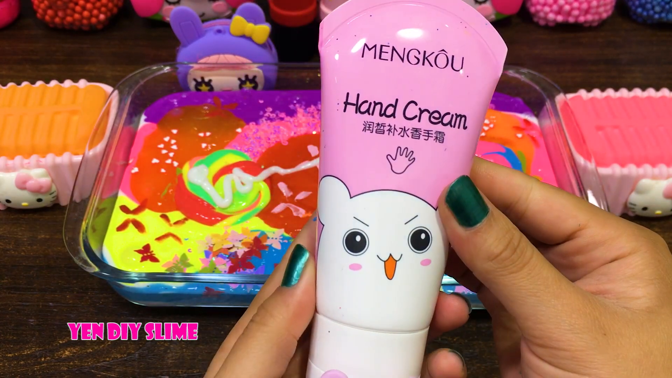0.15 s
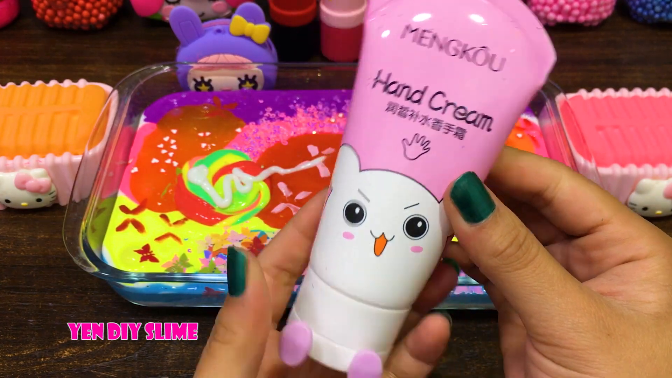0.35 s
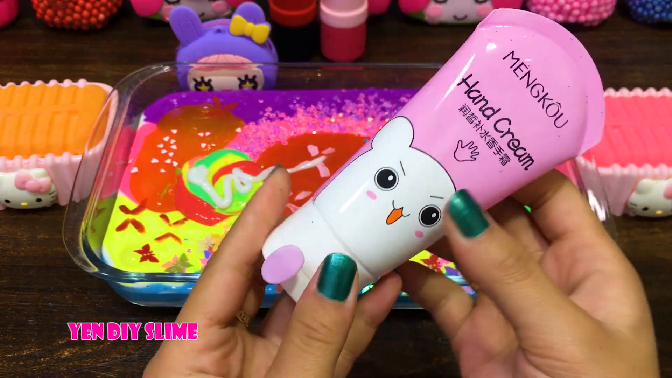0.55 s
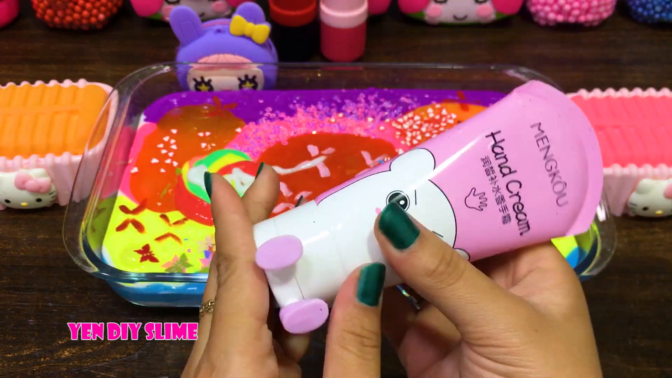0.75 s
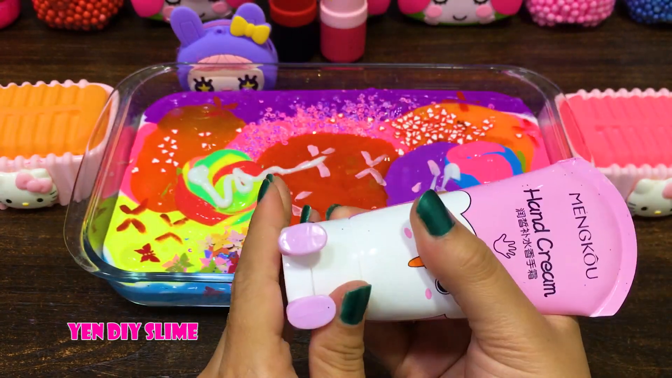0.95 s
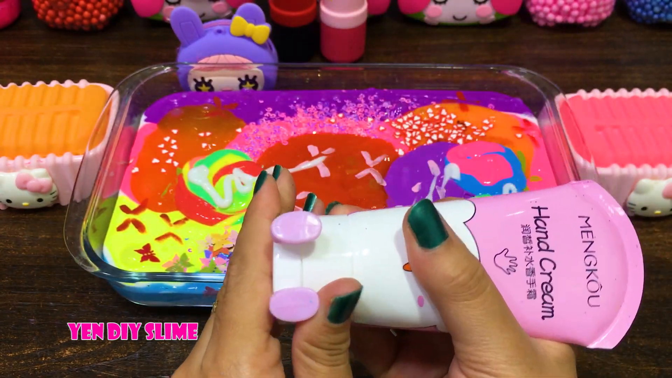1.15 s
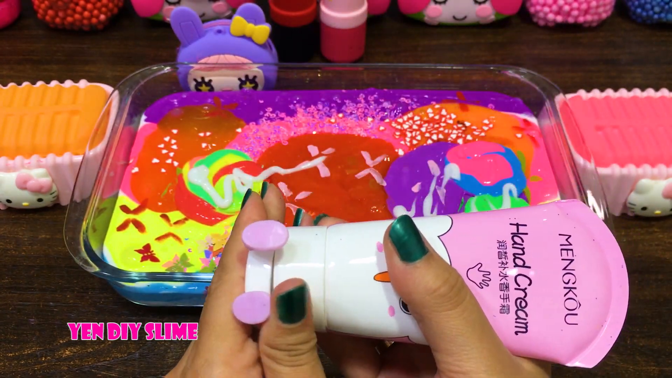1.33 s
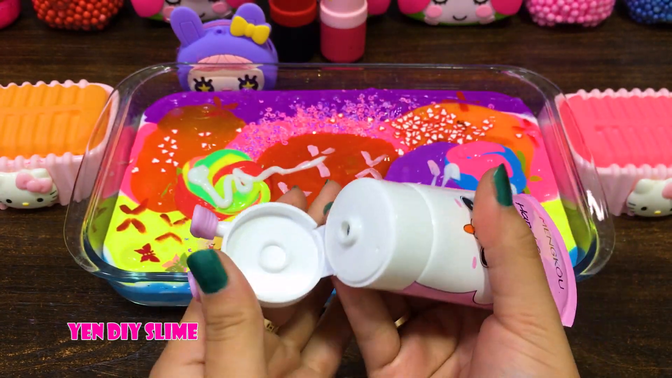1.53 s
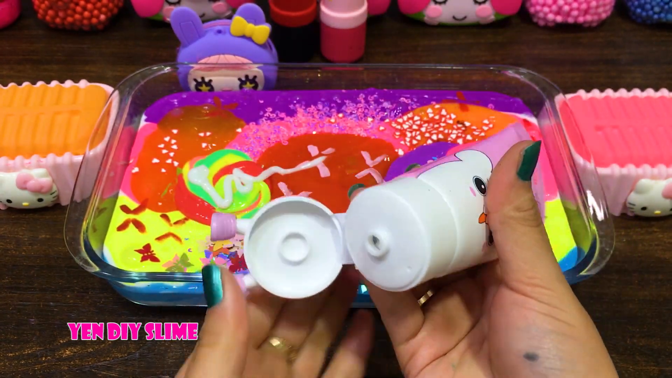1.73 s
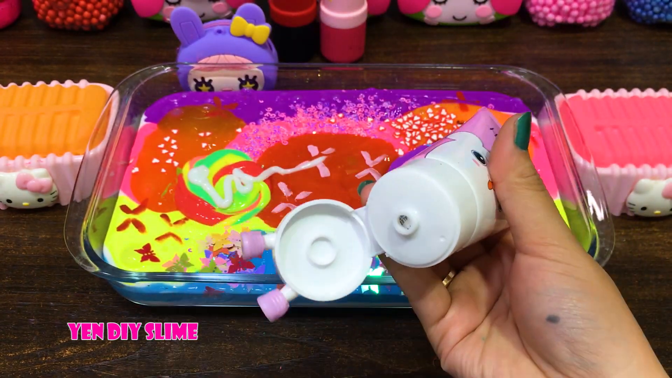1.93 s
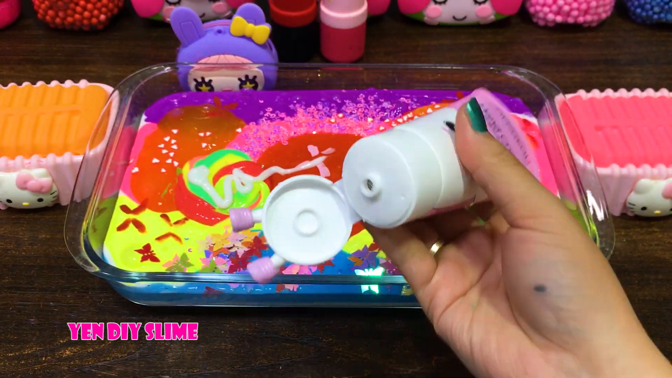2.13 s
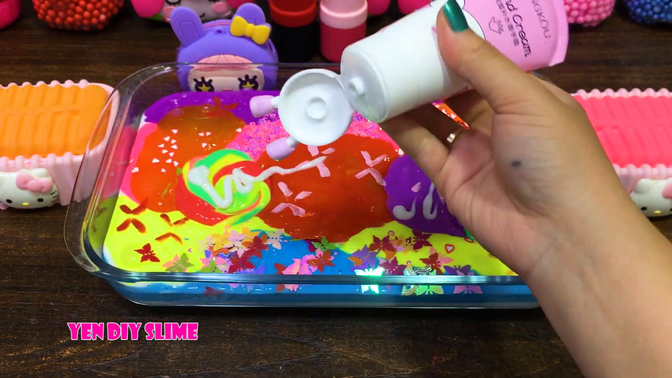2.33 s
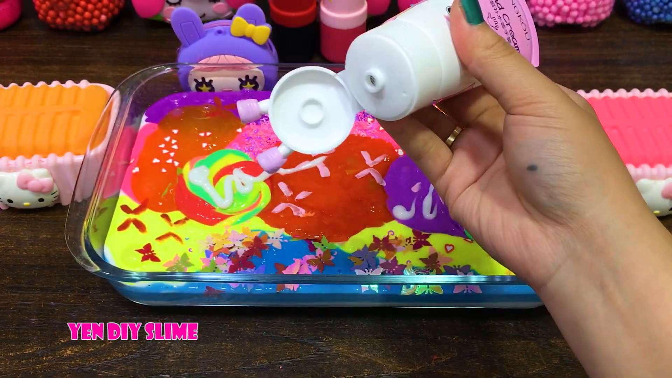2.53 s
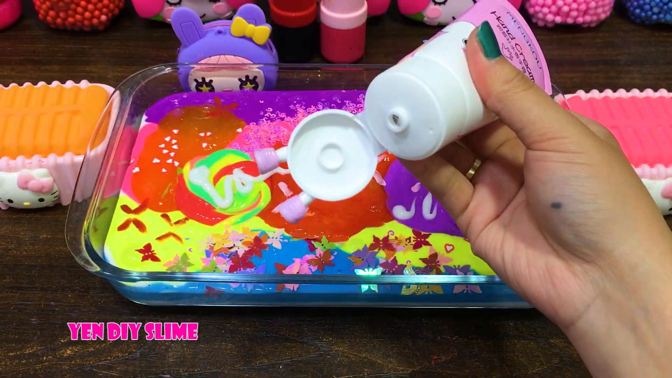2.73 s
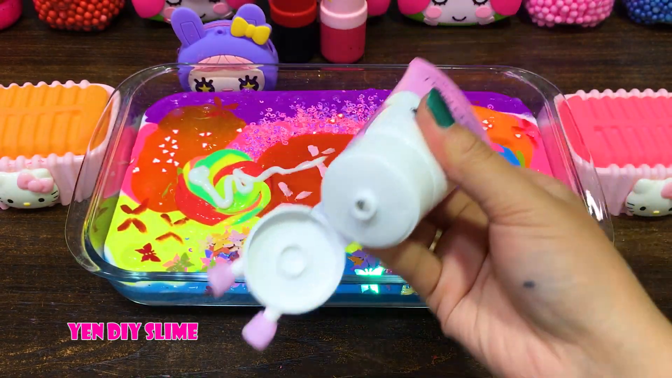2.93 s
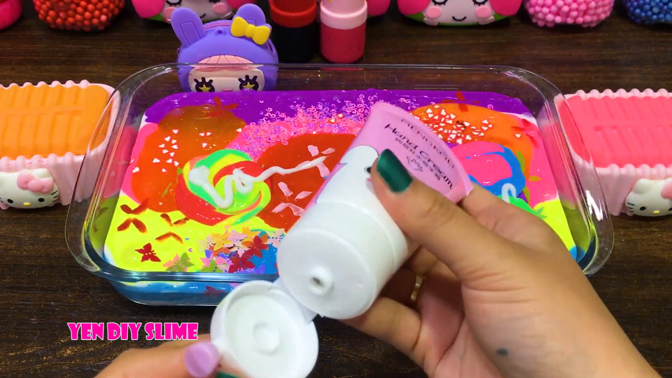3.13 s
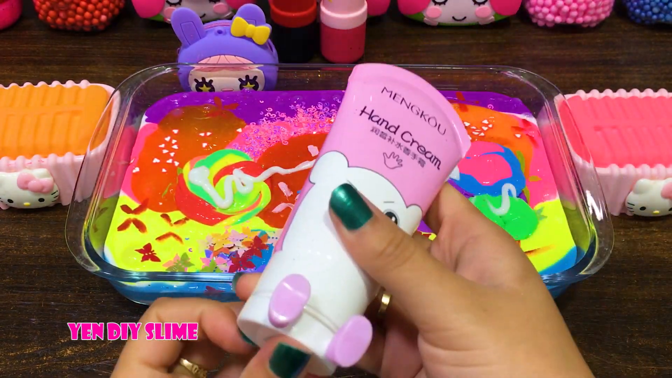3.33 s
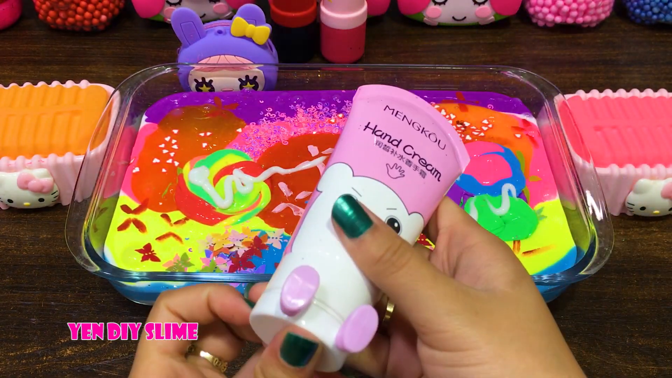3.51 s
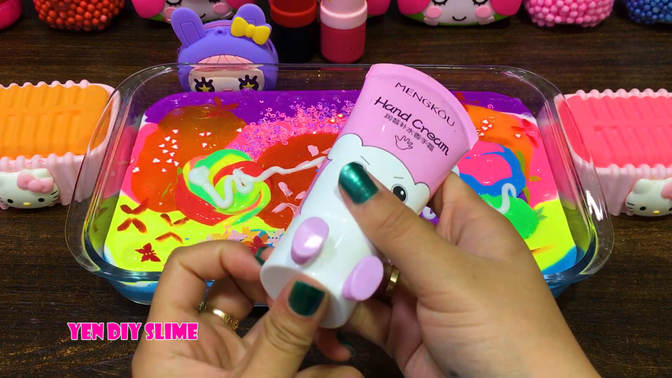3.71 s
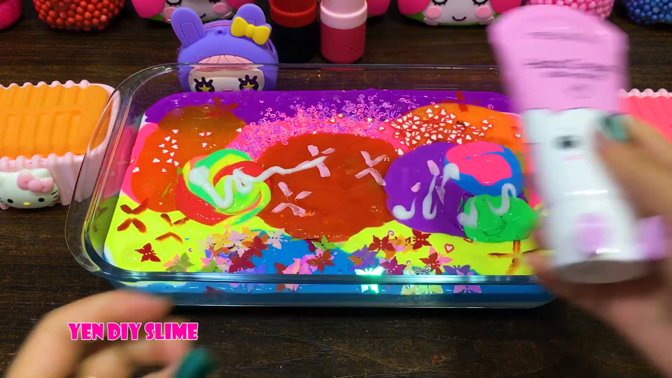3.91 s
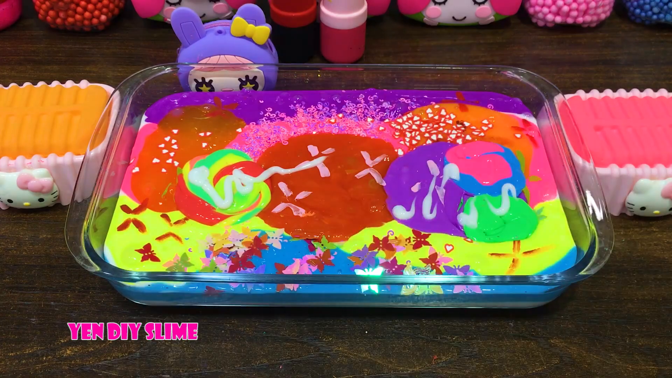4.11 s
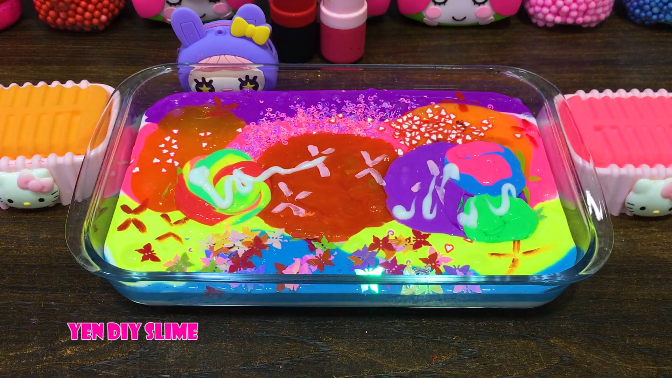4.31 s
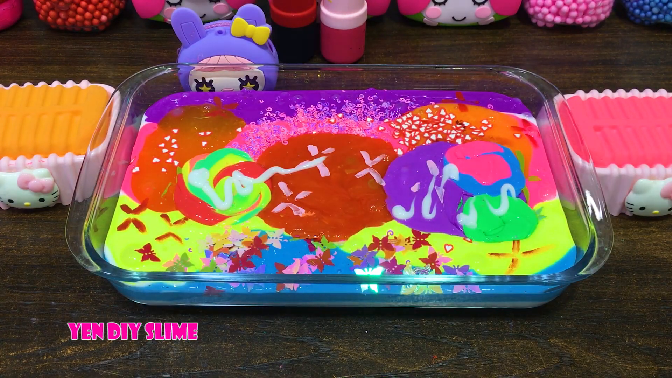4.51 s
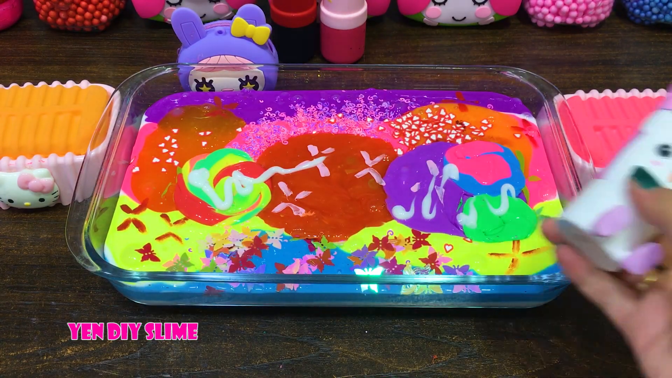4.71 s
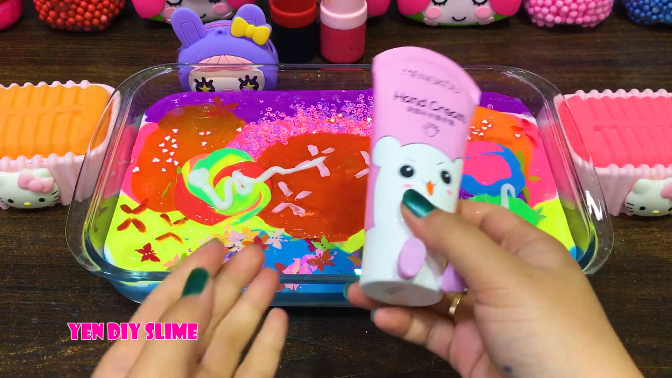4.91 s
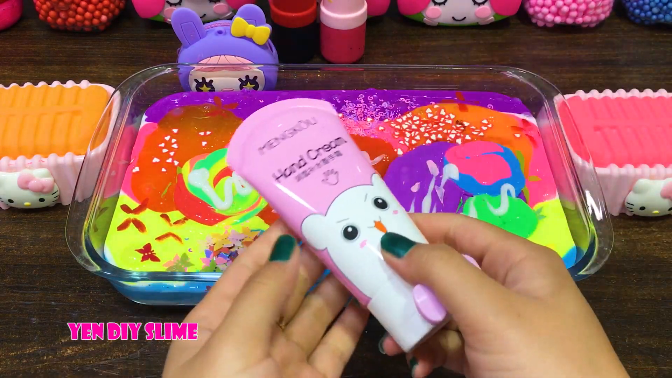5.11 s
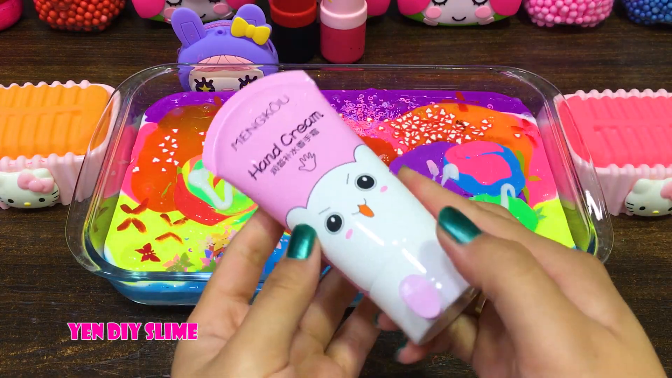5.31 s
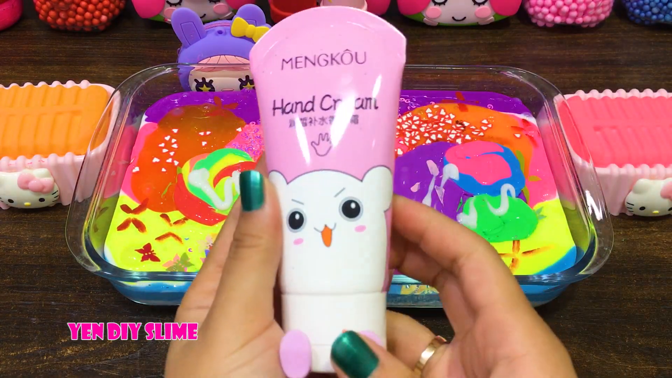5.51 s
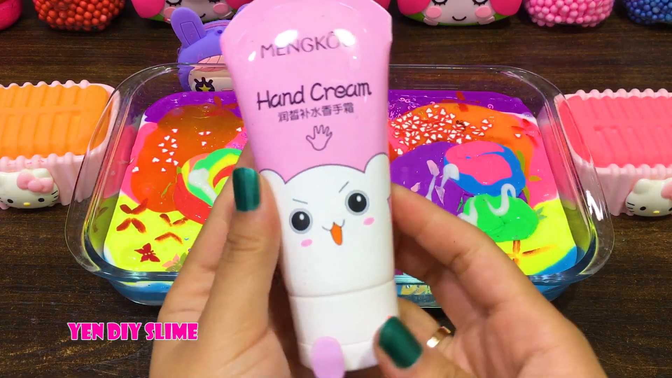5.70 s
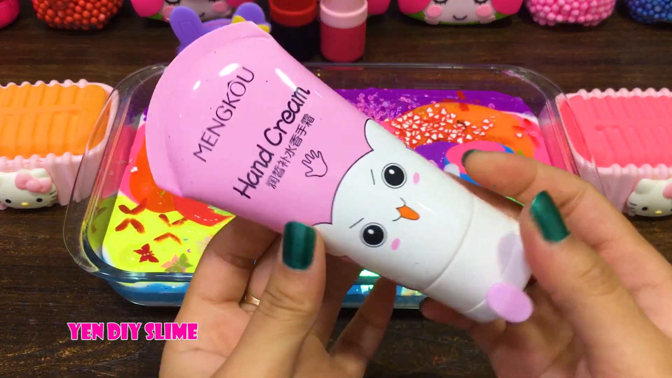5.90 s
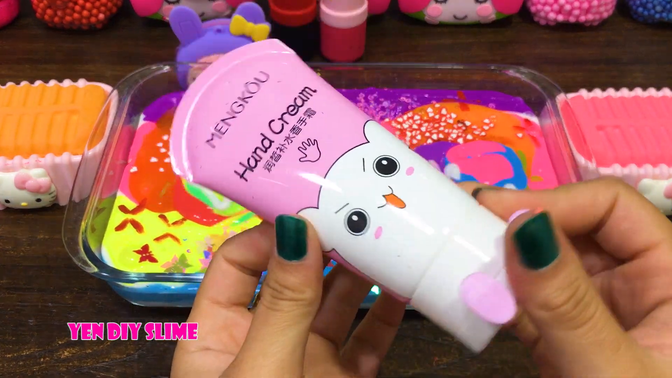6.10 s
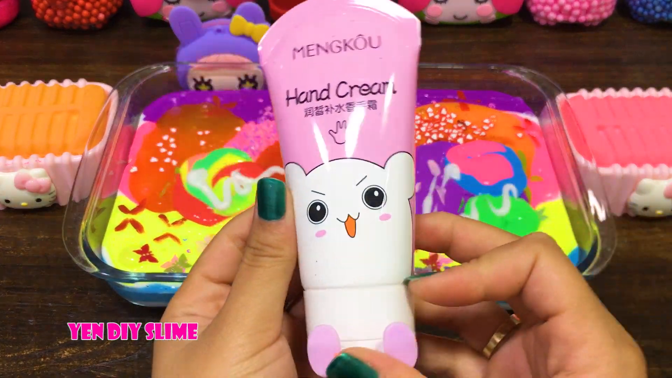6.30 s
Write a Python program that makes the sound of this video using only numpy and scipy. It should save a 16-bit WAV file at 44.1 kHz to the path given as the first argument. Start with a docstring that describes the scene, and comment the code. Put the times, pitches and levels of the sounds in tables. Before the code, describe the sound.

In a small, quiet room, a plastic tube is turned in the hands with light ticks and soft skin friction, heard up close. The cap opens with a pop, followed by a tiny creak of the hinge. A few ticks and a crisp click lead to the loudest sound, the hollow snap of the cap shutting. Faint rubbing follows as a low background hum rises slightly and stays.

```python
"""A plastic squeeze tube is turned in the hands, close by, in a small quiet room with a faint hum.
Fingers rub; the cap ticks lightly. It pops open (1.5 s); its hinge creaks in stick-slip as the
lid is bent back. The lid is folded down, ticks on the rim, clicks over the latch (3.4 s) and is
pressed home with a hollow snap (3.85 s). Each contact rings a part of the cap and knocks the tube.
Light handling goes on; the hum comes up (5.5 s), surges once and stays."""
import sys
import numpy as np
from scipy import signal
from scipy.fft import rfft, irfft
from scipy.io import wavfile

SR = 44100
rng = np.random.default_rng(int(sys.argv[2]) if len(sys.argv) > 2 else 0)


def waveform_to_disk(signal):
    """Save audio, clipped to [-1, 1], as 16-bit WAV at the path in sys.argv[1]."""
    frames = np.transpose(np.atleast_2d(signal))
    scaled = np.clip(frames, -1, 1) * 32767
    samples = np.round(scaled).astype(np.int16)
    wavfile.write(sys.argv[1], SR, samples)


N = 280035

# still air: f/Hz, level/dB
AIR_SPECTRUM = [(15, -40.5), (28, -17.5), (42, -8.5), (58, -0.5), (85, -3), (130, -8.5), (200, -10),
                (330, -12), (530, -18.5), (840, -21.5), (1700, -24), (3700, -28), (5200, -27.5),
                (6500, -30.5), (8200, -28), (12200, -31.5), (13600, -33.5), (15500, -33)]
# rumble within the air: t/s, level/dB
RUMBLE_CURVE = [(0, 2), (.4, 3.5), (.7, -4), (1.25, 0), (1.9, -6.5), (2.7, -4.5), (4.3, -3), (5.0, 2),
                (6.35, 3)]
# hum: f/Hz, level/dB once risen, extra level/dB in the surge
HUM_TONES = [(79.8, -64.5, 11.5), (137, -67, 2), (200, -78, -4)]
# room tail decay: f/Hz, T60/s
TAIL_DECAY = [(100, 0.23), (400, 0.25), (1000, 0.1265), (2000, 0.2348), (3200, 0.2164), (5000, 0.27),
              (10000, 0.2), (16000, 0.26)]
# room tail colour: f/Hz, level/dB
TAIL_SPECTRUM = [(60, 4.5), (200, 6), (400, 3), (700, 6.5), (1500, 0.5), (2300, 3), (3100, 0.5), (4200, 0),
                 (6000, -1), (9000, -1), (16000, -2.5)]
# near surfaces: delay/ms, level/dB
REFLECTIONS = [(5.8, -33), (10.4, -28), (17.6, -28.5)]
# skin friction: f/Hz, level/dB
RUB_SPECTRUM = [(200, -1), (600, 2.5), (1500, 5), (3000, -0.5), (5500, -1), (9000, -2.5), (12000, -4.5),
                (16000, -8.5)]
# skin sliding on the tube: peak t/s, swell/s, level/dB, tilt/(dB/octave)
FINGER_STROKES = [(.05, 0.076, -76, -1), (.68, 0.078, -73.5, -1), (.89, 0.029, -64.5, 2.5),
                  (0.941, 0.027, -65, 0.5), (1.008, 0.017, -59.5, -.5), (1.051, 0.02, -58.5, 3),
                  (1.80, 0.05, -62, -2.5), (1.895, .02, -63, -2), (2.0, 0.13, -73, -1),
                  (2.42, 0.19, -73.5, -2), (2.99, 0.014, -69, 3.5), (3.14, 0.053, -69.5, 3.5),
                  (3.426, 0.032, -62.5, 2), (4.221, 0.17, -70, -0.5), (5.19, 0.058, -67.5, -1),
                  (5.421, 0.049, -70.5, 1)]
# light ticks on the cap, and the hinge's first slip before the creak: t/s, level/dB, brightness/Hz
LIGHT_TICKS = [(.264, -23, 1000), (.626, -31, 12000), (0.6707, -21.5, 1400), (0.7088, -24, 1100),
               (.7717, -23.5, 5000), (1.003, -24, 1000), (1.0556, -23.5, 9000), (1.672, -21.5, 4000),
               (3.376, -23.5, 4520), (3.4266, -20.5, 4980), (3.8325, -25, 3010), (4.0146, -30, 11970),
               (4.8639, -24, 2200), (5.9629, -22, 3180)]
# hinge bent back in two pushes: t/s, rate/(slips/s), level/dB
HINGE_BEND = [(1.711, 162, -20.5), (1.718, 223, -33), (1.74, 210, -22.5), (1.754, 182, -31),
              (1.757, 57, -28), (1.777, 171, -20), (1.792, 215, -23.5), (1.804, 104, -18), (1.848, 68, -31)]
# resonances of each part: f/Hz, width/Hz, level/dB
TUBE_MODES = [(87.7, 86, -13.5), (165, 110, -5.5), (263, 64, 1), (373, 78, 1), (483, 160, -3.5),
              (660, 170, -7.5)]
RIM_MODES = [(712, 300, -9.5), (1290, 160, -7.5), (2050, 270, -8), (2880, 600, -10.5), (4155, 550, -4),
             (5200, 1100, 0.5), (6900, 850, -6.5), (8500, 1100, -6.5), (10757, 1800, -8.5),
             (14900, 2900, -9.5)]
HINGE_MODES = [(700, 145, 1), (1333, 93, 9), (1940, 630, -25), (2770, 400, 2.5), (4450, 390, -7),
               (5600, 190, 9), (7300, 1300, -9), (9500, 770, -4), (13500, 3900, -6)]
LID_MODES = [(114, 210, -8.5), (674, 260, -3.5), (903, 88, 0.5), (1290, 124, -6), (2050, 550, -8.5),
             (2856, 550, -13.5), (3590, 200, -2), (4860, 390, 3), (6130, 450, -5), (8530, 480, -9.5),
             (11570, 1000, -23), (13000, 1700, -21)]
LATCH_MODES = [(650, 232.6, -17), (1132, 260, -9), (1372, 143, -3.5), (2210, 220, -13), (2610, 270, -10),
               (4230, 250, 1), (5326, 920, -6.5), (5893, 310, 1.5), (7660, 700, -6), (8683, 790, -21),
               (11400, 1700, -8.5), (12464, 1420, -10.5)]
CLOSED_CAP_MODES = [(1006, 110, -15), (1380, 310, -2.5), (1630, 310, 1.5), (1981, 280, -12),
                    (2126, 300, -14.5), (3100, 270, -9.5), (4291, 380, -13), (5400, 640, -14),
                    (7300, 820, -16), (8700, 1300, -15.5), (11485, 2300, -24), (14500, 1630, -24.5)]
# lid contacts: t/s, level/dB, scrape/ms, brightness/Hz, tube knock/dB re level
RIM_CONTACTS = [(1.1640, -6.5, 1, 12000, -10), (1.1651, -5.5, 1, 11900, -12.5), (3.2216, -7.5, .8, 5840, 6),
                (3.2372, -9.5, .8, 13810, -3.5), (3.2381, 2.5, .7, 7700, -13.5),
                (3.2659, -3, .9, 9000, -11), (3.2698, -5.5, .4, 9080, -5.5)]  # edge catches on the rim
OPEN_CONTACTS = [(1.5444, -6, 1.4, 2500, -8), (1.5472, 5.5, 0.4, 11900, -5.5), (1.5479, 6.5, 3.2, 12000, 1)]  # lid springs free
LATCH_CONTACTS = [(3.4488, 19.2, 0.65, 16000, -18), (3.4581, 11, 0.602, 15980, -17.5)]  # lid jumps the latch
SEAT_CONTACTS = [(3.8498, 21.84, .7, 14220, -17), (3.8508, 29.63, 0.82, 4497, -12)]  # plug seats in the nozzle
# crack thrown sideways by the final snap: f/Hz, level/dB re the contact
CRACK_SPECTRUM = [(500, -29), (2300, -16.5), (6000, -20), (12000, -18.5), (16000, -25)]


def from_db(db):
    """Decibels to gain."""
    return 10 ** (np.asarray(db) / 20)


def unit_rms(x):
    """Scale to unit power."""
    return x / np.sqrt(np.mean(x ** 2) + 1e-20)


def at_hz(points, hz):
    """Interpolate a table over log frequency."""
    points_hz, values = np.transpose(points)
    return np.interp(np.log(np.maximum(hz, 1)), np.log(points_hz), values)


def coloured(x, spectrum):
    """Filter by a table of f/Hz, level/dB."""
    hz = np.fft.rfftfreq(len(x), 1 / SR)
    return irfft(rfft(x) * from_db(at_hz(spectrum, hz)), len(x))


def drift(rate_hz):
    """Low-passed random curve, unit RMS."""
    hz = np.fft.rfftfreq(N, 1 / SR)
    return unit_rms(irfft(rfft(rng.standard_normal(N)) / (1 + (hz / rate_hz) ** 2), N))


def air(level_db=-65, swell_db=1.0):
    """Even hiss; the rumble below 120 Hz comes and goes."""
    noise = from_db(level_db) * unit_rms(coloured(rng.standard_normal(N), AIR_SPECTRUM))
    rumble = signal.sosfiltfilt(signal.butter(2, 120, fs=SR, output="sos"), noise)
    rumble_db = np.interp(np.arange(N) / SR, *np.transpose(RUMBLE_CURVE)) + swell_db * drift(5)
    return noise + rumble * (from_db(rumble_db) - 1)


def hum(waver_db=1.2, wander_hz=0.4):
    """Low wavering tones: they come up, surge once with a sag in pitch, and stay."""
    early_db, rise_at_s, rise_s = -13, 5.5, 0.05
    surge_at_s, surge_half_s, sag_ratio = 5.595, 0.06, 0.045
    t = np.arange(N) / SR
    surge = np.exp(-((t - surge_at_s) / surge_half_s) ** 2)
    tones = 0
    for hz, db, surge_db in HUM_TONES:
        pitch_hz = hz * (1 - sag_ratio * surge) + wander_hz * drift(4.2)
        gain = from_db(db + surge_db * surge + waver_db * drift(4))
        tones += np.sqrt(2) * gain * np.sin(2 * np.pi * np.cumsum(pitch_hz) / SR)
    before_rise = (1 - np.tanh((t - rise_at_s) / rise_s)) / 2
    return tones * from_db(early_db * before_rise)


def room(build_s, tail_db=-17):
    """Impulse response: near reflections and a diffuse tail that dies band by band."""
    t = np.arange(SR // 2) / SR
    hz = np.fft.rfftfreq(len(t), 1 / SR)
    diffuse = rfft(coloured(rng.standard_normal(len(t)), TAIL_SPECTRUM))
    edges_hz, tail = np.geomspace(40, 20000, 13), 0
    for low, high in zip(edges_hz, edges_hz[1:]):
        band = irfft(diffuse * ((hz >= low) & (hz < high)), len(t))
        t60_s = at_hz(TAIL_DECAY, np.sqrt(low * high))
        tail += band * from_db(-60 * t / t60_s)
    tail *= 1 - np.exp(-(t / build_s) ** 2)
    response = from_db(tail_db) * tail / np.linalg.norm(tail)
    for delay_ms, db in REFLECTIONS:
        response[int(delay_ms * SR / 1000)] += from_db(db)
    return response


def rubbing(grip_db=-79.5, grain_db=3.5, grain_hz=200.4, release_ratio=0.7):
    """Skin friction: tiny uneven catches, faint in the grip, swelling with each stroke."""
    catches = rng.standard_normal(N) * from_db(grain_db * drift(grain_hz))
    grains = unit_rms(coloured(catches, RUB_SPECTRUM))
    rustle = from_db(grip_db) * grains
    t = np.arange(N) / SR
    for peak_s, swell_s, db, tilt_db_per_octave in FINGER_STROKES:
        progress = (t - peak_s) / np.where(t < peak_s, swell_s, swell_s * release_ratio)
        near = np.abs(progress) < 3
        tilt = [(500, 0), (16000, tilt_db_per_octave * np.log2(16000 / 500))]
        envelope = from_db(db) * np.exp(-progress[near] ** 2)
        rustle[near] += envelope * unit_rms(coloured(grains[near], tilt))
    return rustle


def contact_force(contacts, grit):
    """Sudden release plus a dying scrape, low-passed by softness; grit = scrape/release ratio."""
    force = np.zeros(N)
    t_ms = np.arange(SR // 100) * 1000 / SR
    for at_s, db, scrape_ms, bright_hz, *_ in contacts:
        scrape = rng.standard_normal(len(t_ms)) * np.exp(-t_ms / scrape_ms)
        pulse = grit * scrape / np.linalg.norm(scrape)
        pulse[0] = 1
        pole = np.exp(-2 * np.pi * bright_hz / SR)
        softened = signal.lfilter([1 - pole], [1, -pole], pulse)
        start = int(at_s * SR)
        force[start:start + len(t_ms)] += from_db(db) * softened / np.hypot(1, grit)
    return force


def ring(force, modes, travel_ms):
    """Parallel resonances; bending waves are slower in the bass (travel_ms holds at 1 kHz)."""
    response = np.zeros(SR // 10)
    for k, (hz, width_hz, db) in enumerate(modes):
        radius = np.exp(-np.pi * width_hz / SR)
        feedback = [1, -2 * radius * np.cos(2 * np.pi * hz / SR), radius ** 2]
        lag = int(travel_ms * SR / np.sqrt(1000 * hz))
        mode = signal.lfilter([1, 0, -1], feedback, signal.unit_impulse(len(response), lag))
        response += (-1) ** k * from_db(db) * (1 - radius ** 2) / 2 * mode
    return signal.oaconvolve(force, response)[:N]


def snaps(contacts, modes, grit, travel_ms):
    """A part of the cap rings; its recoil knocks the soft tube."""
    force = contact_force(contacts, grit)
    knocks = [(at_s, db + knock_db, ms, hz) for at_s, db, ms, hz, knock_db in contacts]
    recoil = contact_force(knocks, grit=0.12)
    return ring(force, modes, travel_ms) + ring(recoil, TUBE_MODES, travel_ms=0.6)


def rim_ticks(scrape_ms=1.2, hard_hz=9947, hard_knock_db=-4, knock_db_per_octave=3):
    """Lid edge and light ticks ring the rim; the duller a tick, the more it knocks the tube."""
    ticks = []
    for at_s, db, bright_hz in LIGHT_TICKS:
        knock_db = hard_knock_db + knock_db_per_octave * np.log2(hard_hz / bright_hz)
        ticks.append((at_s, db, scrape_ms, bright_hz, knock_db))
    return snaps(RIM_CONTACTS + ticks, RIM_MODES, grit=0.9, travel_ms=0.63)


def hinge(jitter_s=0.0002, scrape_ms=0.8, bright_hz=6000, knock_db=-3):
    """Stick-slip creak: the strap slips once per step of bend."""
    bend_s, slips_per_s, bend_db = np.transpose(HINGE_BEND)
    t = np.arange(bend_s[0], bend_s[-1], 1 / SR)
    steps = np.cumsum(np.interp(t, bend_s, slips_per_s)) / SR
    slips = []
    for due_s in np.interp(np.arange(np.ceil(steps[-1])), steps, t):
        at_s = due_s + jitter_s * rng.standard_normal()
        slips.append((at_s, np.interp(due_s, bend_s, bend_db), scrape_ms, bright_hz, knock_db))
    return snaps(slips, HINGE_MODES, grit=0.7, travel_ms=0.78)


def plug_crack():
    """Bare crack of the plug going home, heard only via the walls."""
    return coloured(contact_force(SEAT_CONTACTS[-1:], grit=0.1), CRACK_SPECTRUM)


def cap():
    """The lid springs free, later jumps the latch; the plug seats and rings the closed cap."""
    opening = snaps(OPEN_CONTACTS, LID_MODES, grit=0.72, travel_ms=0.79)
    latching = snaps(LATCH_CONTACTS, LATCH_MODES, grit=0.75, travel_ms=0.8)
    seating = snaps(SEAT_CONTACTS, CLOSED_CAP_MODES, grit=0.2, travel_ms=0.3)
    return opening + latching + seating


def scene():
    """Hum and still air, then the tube and its room reflections; mono."""
    background = hum() + air()
    walls, side_walls = room(build_s=0.0053), room(build_s=0.0042)
    sideways = signal.fftconvolve(plug_crack(), side_walls)[:N]
    handling = cap() + rim_ticks() + rubbing() + hinge()
    reverb = signal.fftconvolve(handling, walls)[:N]
    return (background + sideways + reverb + handling)[None]


def record(dry):
    """Microphone: low cut, clip at full scale, high cut."""
    low_cut_hz, high_cut_hz = 38.4, 16200
    thinned = signal.sosfilt(signal.butter(4, low_cut_hz, "high", fs=SR, output="sos"), dry)
    clipped = np.clip(thinned, -1, 1)
    return signal.fftconvolve(clipped, signal.firwin(151, high_cut_hz, fs=SR)[None], "same")


dry = scene()
out = record(dry)
waveform_to_disk(out)
```